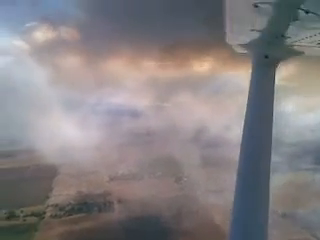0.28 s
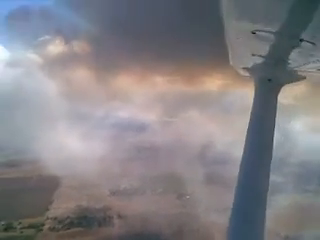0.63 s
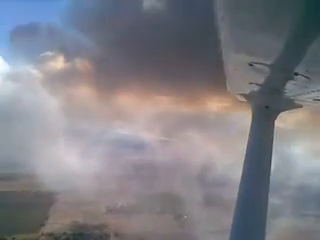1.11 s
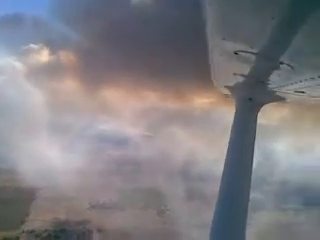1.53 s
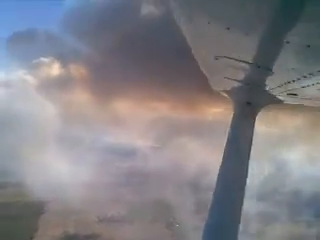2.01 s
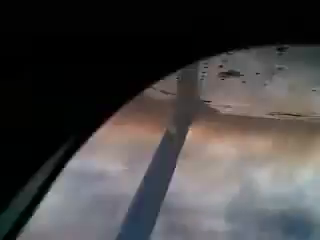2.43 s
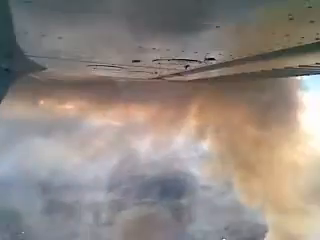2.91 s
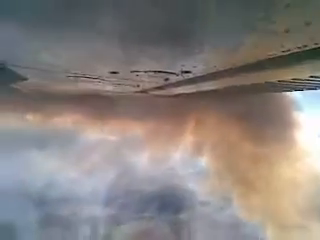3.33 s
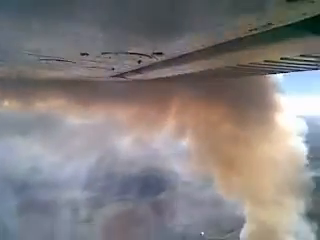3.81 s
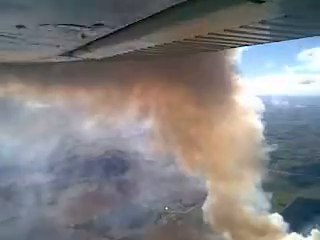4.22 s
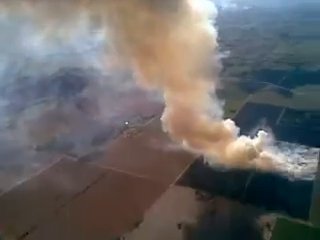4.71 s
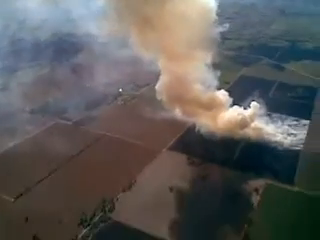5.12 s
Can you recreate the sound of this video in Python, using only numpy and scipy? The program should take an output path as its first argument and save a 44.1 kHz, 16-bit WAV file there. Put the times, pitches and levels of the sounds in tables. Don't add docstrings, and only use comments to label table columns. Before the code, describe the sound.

Inside a small plane in cruise, a low propeller and engine drone runs steadily under dense rushing air. Around two seconds the hand-held phone knocks the door post with a short dull thud; afterwards the drone changes colour, a window panel rings faintly in gusts, and a window-seal hiss rises near the end.

```python
import sys
import numpy as np
from scipy import signal
from scipy.io import wavfile
from scipy.ndimage import uniform_filter1d

SR = 44100
rng = np.random.default_rng(int(sys.argv[2]) if len(sys.argv) > 2 else 0)


def elevation(decibels):
    levels = np.asarray(decibels, float)
    return 10 ** (levels / 20)


def wrap_up_sound(samples):
    columns = np.atleast_2d(samples).T
    tamed = np.clip(columns, -1, 1)
    steps = np.round(tamed * 32767).astype(np.int16)
    wavfile.write(sys.argv[1], SR, steps)


N = 237610
HOP = 256


def bell(x, centre, half_width):
    return np.exp(-((x - centre) / half_width) ** 2)


def resonance(hz, centre_hz, width_hz):
    return 1 / (1 + (2 * (hz - centre_hz) / width_hz) ** 2)


def on_log(hz, points_hz, db):
    return np.interp(np.log(hz), np.log(points_hz), db)[:, None]


def walk(rate, count, size, step):
    hold = max(int(SR / step / rate), 1)
    held = np.repeat(rng.standard_normal((count, size // hold + 1)), hold, axis=1)
    slewed = uniform_filter1d(uniform_filter1d(held, hold), hold)
    return 2.0 * slewed[:, :size]


def flicker(hz, s, db, rate):
    band = np.clip(3 * np.log2(hz / 20), 0, 30).astype(int)
    depth = db / (1 + (hz / 2200) ** 2 + (120 / hz) ** 2)[:, None]
    return depth * walk(rate, count=31, size=len(s), step=HOP)[band]


def coloured(db_of):
    hz, s, z = signal.stft(rng.standard_normal(N), SR, nperseg=8 * HOP, noverlap=7 * HOP)
    z = z * elevation(db_of(np.maximum(hz, 1), s))
    return signal.istft(z, SR, nperseg=8 * HOP, noverlap=7 * HOP)[1][:N]


# t/s, turn to the side [0-1], place along its path [m]
PHONE = [(0, 0.17, 0.061), (1.2, 0, 0.024), (2.05, 0.06, 0.24), (2.3, 0.53, 0.27), (2.6, 0.99, 0.37),
         (2.85, .85, .43), (3.2, 0.74, 0.52), (3.6, .75, 0.66), (4.1, .93, .72), (4.6, 1.0, 0.81),
         (4.9, 1, 0.85), (5.39, 0.88, 1.0)]


def phone(t):
    times, side, place = np.transpose(PHONE)
    return np.interp(t, times, side), np.interp(t, times, place)


# level/dB facing front, level/dB facing side
STRONG = [(-21.5, -20), (-38, -30.5), (-33.5, -33), (-37.5, -45.5), (-28, -38), (-26.5, -26.5)]
WEAK_ORDERS = [2.5, 4.25, 5.5, 7, 8, 9, 10, 11, 12, 13, 14, 16, 20, 21]
# level/dB facing front, level/dB facing side
WEAK = [(-42, -48), (-43.5, -63.5), (-43.5, -45), (-42, -47.5), (-44.5, -54.5), (-54, -44.5),
        (-43.5, -47.5), (-48, -50.5), (-54.5, -44.5), (-57, -50), (-57, -53.5), (-51, -59.5), (-56, -63),
        (-53.5, -67.5)]
# place [m], half width [m], level/dB
SPOTS = [(0.471, 0.03, -1.5), (0.701, .25, 5.5), (.16, .06, -9), (0.379, 0.055, -7), (0.771, .09, 7.5),
         (0.88, .12, 7.5), (.17, 0.078, -4), (.32, 0.031, 7), (.42, 0.027, 3), (.56, .09, -16.5),
         (0.729, .1, -21), (1.0, 0.13, -8)]
SPOT_ORDERS = [1, 2, 3, 3, 3, 4, 5, 5, 6, 6, 6, 6]
START_HZ, SETTLED_HZ, SETTLE_S = 72.9, 71.8, 3.5


def drone(t):
    blade_hz = SETTLED_HZ + (START_HZ - SETTLED_HZ) * np.exp(-t / SETTLE_S)
    turns = np.cumsum(blade_hz) / SR
    side, place = phone(t)
    orders = [1, 2, 3, 4, 5, 6] + WEAK_ORDERS
    levels = [front + (aside - front) * np.clip(side, 0, 1) for front, aside in [*STRONG, *WEAK]]
    for order, (at_m, half_m, db) in zip(SPOT_ORDERS, SPOTS):
        levels[order - 1] = levels[order - 1] + db * bell(place, at_m, half_m)
    waver = walk(9, count=2 * len(orders), size=N // HOP + 2, step=HOP)
    waver_at, at = np.arange(waver.shape[1]), np.arange(N) / HOP
    out = np.zeros(N)
    for i, (order, db) in enumerate(zip(orders, levels)):
        size = np.interp(at, waver_at, waver[2 * i])
        slip = np.interp(at, waver_at, waver[2 * i + 1])
        start = .11 * order * order
        phase = 2 * np.pi * (order * turns + start) + .04 * order * slip
        out += elevation(db + .25 * order ** 0.54 * size) * np.sin(phase)
    return np.sqrt(2) * out, turns


# f/Hz, level/dB per Hz facing front, level/dB per Hz facing side
RUSH = [(20.5, -3.5, -12), (49.2, -5, -0.5), (205.6, -1, -5), (370, -7.5, -12), (520, -10.5, -11),
        (812, -11.5, -9), (1023, -14.5, -19), (1497, -19.5, -27), (1854, -31, -33), (2107, -26, -20),
        (2600, -23, -19), (2908, -30.5, -31.5), (4317, -38, -37), (4637, -41.5, -42.5)]
# f/Hz, width/Hz, level/dB
RIDGES = [(48, 20, 5.5), (105, 22, 3.5), (3230, 320, 2), (5126, 240, 2.5), (6054, 1000, 4.5)]
# f/Hz, width/Hz, place [m], half width [m], level/dB
POCKETS = [(2390, 260, .37, .05, 1.5), (5110, 220, .6, 0.091, 4.5), (801, 350, .65, 0.16, 2.5),
           (725, 430, .36, 0.047, -2.5), (630, 290, 0.95, 0.16, -4), (356, 110, 0.96, 0.16, 4),
           (173, 55, 0.92, 0.14, 3), (1250, 140, .65, .2, 3.5), (105, 33, .03, 0.18, -2.5)]
RUSH_DB, RUSH_FADE_DB_PER_M2 = -5, -2


def rush(turns):
    def db_of(hz, s):
        side, place = phone(s)
        points_hz, front, aside = np.transpose(RUSH)
        colour = on_log(hz, points_hz, front) * (1 - side) + on_log(hz, points_hz, aside) * side
        trim = -27 * np.log2(np.maximum(hz / points_hz[-1], 1))
        ridges = sum(db * resonance(hz, centre_hz, width_hz) for centre_hz, width_hz, db in RIDGES)
        for centre_hz, width_hz, at_m, half_m, db in POCKETS:
            nearness = bell(place, at_m, half_m)
            colour = colour + db * np.outer(resonance(hz, centre_hz, width_hz), nearness)
        level = RUSH_DB + RUSH_FADE_DB_PER_M2 * place ** 2
        return colour + (trim + ridges)[:, None] + level + flicker(hz, s, db=1.33, rate=6.6)
    wash = 1 + .05 * np.cos(2 * np.pi * turns) + 0.1 * np.cos(4 * np.pi * turns)
    return coloured(db_of) * wash


# t/s, level/dB
GUSTS = [(.78, -12), (2.58, -6.5), (2.93, 1.5), (3.06, 2), (3.32, -12), (3.66, -3), (3.75, 5.5),
         (3.84, -6.5), (4.15, -2), (4.9, -4), (5.0, -9), (5.14, 0.5), (5.34, -8)]
PANEL_HZ, PANEL_WIDTH_HZ = 644, 16
GUST_S, CALM_DB = 0.033, -19.5


def panel():
    def db_of(hz, s):
        peak = 20 * np.log10(resonance(hz, PANEL_HZ, PANEL_WIDTH_HZ))[:, None]
        push = elevation(CALM_DB) + sum(elevation(db) * bell(s, at, GUST_S) for at, db in GUSTS)
        return peak + 20 * np.log10(push)
    return coloured(db_of)


# t/s, peak level/dB, f/Hz, 60 dB decay time/s
BUMP = [
    (2.2205, -8, 230, .025),
    (2.217, -18, 45, .08),
    (2.2195, -15, 120, .04),
    (2.224, -16, 820, .025),
    (2.2215, -13, 400, .018),
]


def bump(t):
    out = np.zeros(N)
    for start, db, hz, t60 in BUMP:
        age = np.maximum(t - start, 0)
        out += elevation(db - 60 * age / t60) * np.sin(2 * np.pi * hz * age)
    return out


# f/Hz, level/dB per Hz
SEAL = [(700, -27.5), (1100, -4.5), (1700, 2.5), (2200, 7), (2650, 2), (2900, -6), (4300, -7.5),
        (5600, -10), (6900, -16), (7400, -21.5), (8800, -21)]
# t/s, hiss level/dB, rise/s, stay/s
LEAKS = [
    (2.33, -49.5, 0.045, 0.24),
    (4.69, -39.5, 0.033, 1.0),
    (4.85, -41, 0.13, 1.0),
]


def seal():
    def ramp(x):
        return .5 + .5 * np.tanh(x)

    def db_of(hz, s):
        near = sum(elevation(db) * ramp((s - at) / rise) * ramp((at + stay - s) / rise)
                   for at, db, rise, stay in LEAKS)
        level = 20 * np.log10(near + 1e-4) + 8.17
        return on_log(hz, *np.transpose(SEAL)) + level + flicker(hz, s, db=0.75, rate=8)
    return coloured(db_of)


def scene():
    t = np.arange(N) / SR
    orders, turns = drone(t)
    return (orders + rush(turns) + panel() + bump(t) + seal())[None]


# f/Hz, step level/dB, share by which louder treble lifts the step [dB/dB]
STEP = [(300, -19, 0), (600, -23, 0), (1000, -26, .2), (1400, -29, .5), (1800, -33, .9), (2300, -29, .6),
        (2900, -33, .6), (3500, -35, .8), (4000, -37, 1), (5000, -38.5, .95), (5700, -41.5, 1.1),
        (7000, -44, 1.1)]
FRAME, FRAME_START, LINES_KEPT, FRAME_SR = 1024, 530, 400, 48000


def round_lines(x):
    x = signal.resample_poly(x, 160, 147)
    n, k = np.arange(2 * FRAME)[:, None] + .5, np.arange(LINES_KEPT) + .5
    window = np.sin(np.pi * n / 2 / FRAME)
    basis = np.sqrt(2 / FRAME) * window * np.cos(np.pi / FRAME * (n + FRAME / 2) * k)
    count, lead = len(x) // FRAME + 3, 2 * FRAME - FRAME_START
    tail = (count + 1) * FRAME - len(x) - lead
    halves = np.pad(x, (lead, tail), "reflect").reshape(-1, FRAME)
    lines = np.hstack([halves[:-1], halves[1:]]) @ basis
    hz = k * FRAME_SR / 2 / FRAME
    treble = np.mean(lines[:, (hz > 3000) & (hz < 6000)] ** 2, axis=1)
    treble_db = 12 * np.log10(uniform_filter1d(treble, 7)) + 52
    band = (8 * np.log2(1 + k / 45)).astype(int)
    whim_db = .4 * rng.standard_normal((count, 1)) + rng.standard_normal((count, band[-1] + 1))[:, band]
    at_hz, step_db, lift = np.transpose(STEP)
    step = elevation((on_log(hz, at_hz, step_db) + on_log(hz, at_hz, lift) * treble_db).T + whim_db)
    sizes = np.floor((abs(lines) / step) ** .75 + .4054) ** (4 / 3)
    frames = (np.sign(lines) * sizes * step) @ basis.T
    joined = (frames[:-1, FRAME:] + frames[1:, :FRAME]).ravel()[lead - FRAME:]
    return signal.resample_poly(joined, 147, 160)[:N]


def roll_off(x):
    return signal.sosfilt(signal.butter(12, 8800, fs=SR, output="sos"), x)


def record(dry):
    microphone = signal.butter(2, 36, "high", fs=SR, output="sos")
    heard = signal.sosfilt(microphone, dry[0])
    mix = round_lines(heard)[None]
    return roll_off(mix)


dry = scene()
out = record(dry)
wrap_up_sound(out)
```